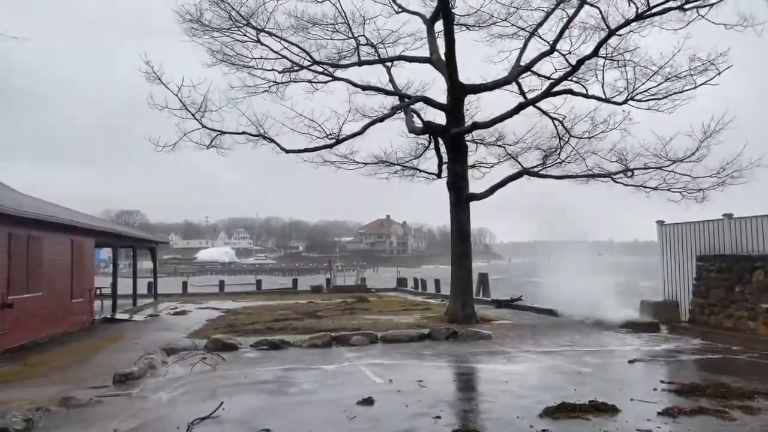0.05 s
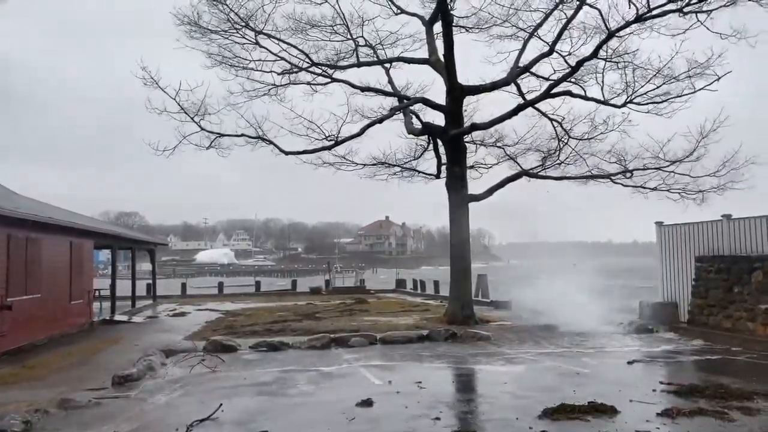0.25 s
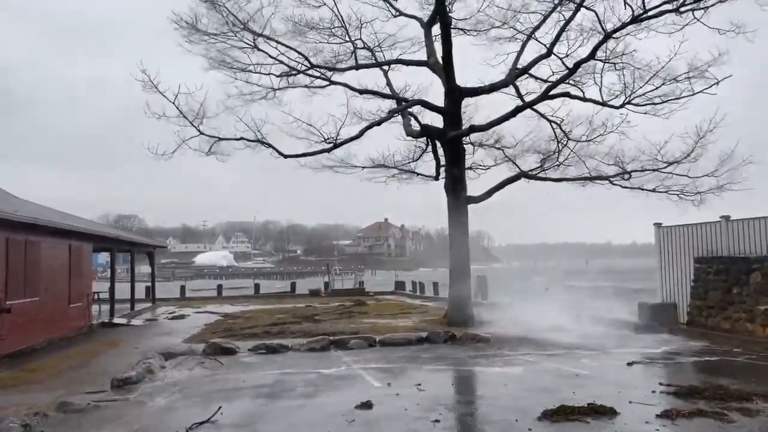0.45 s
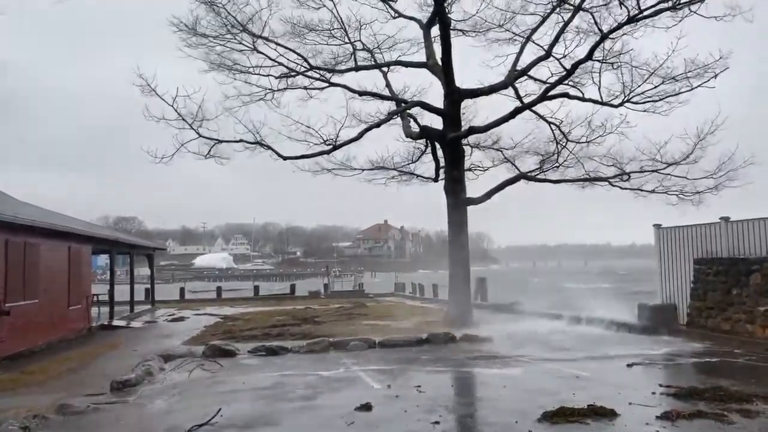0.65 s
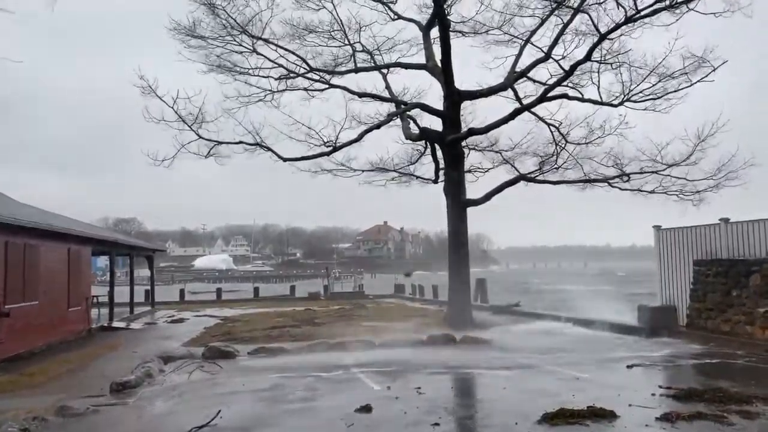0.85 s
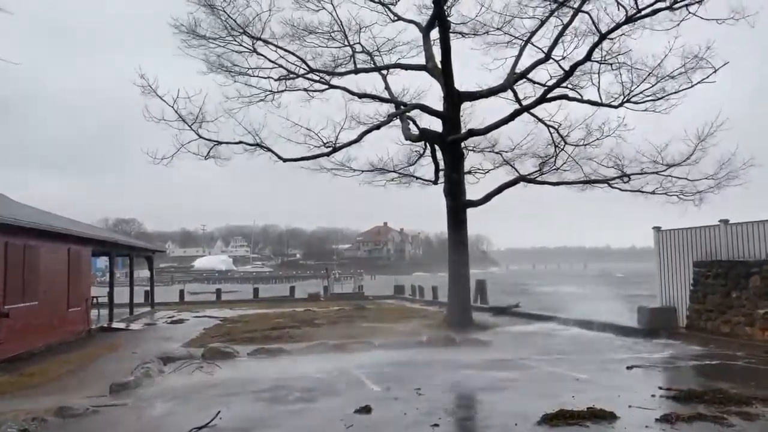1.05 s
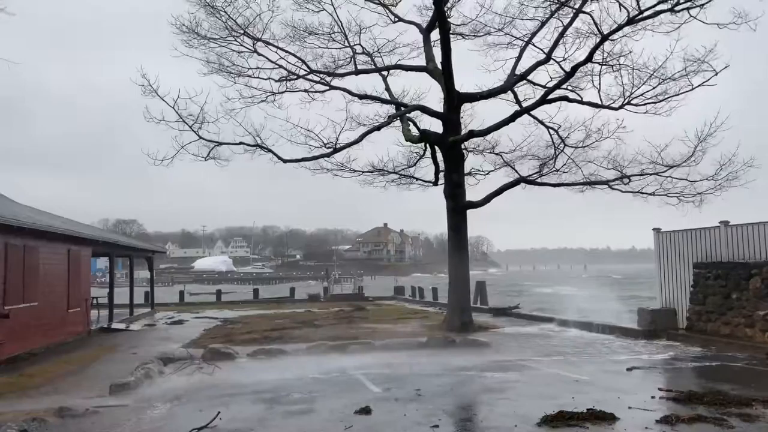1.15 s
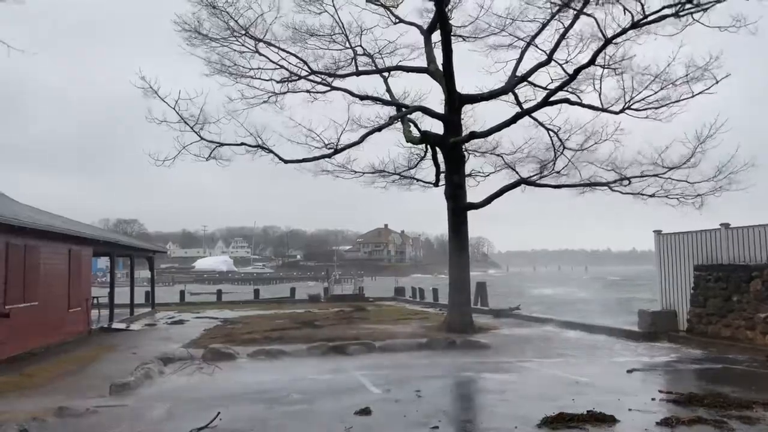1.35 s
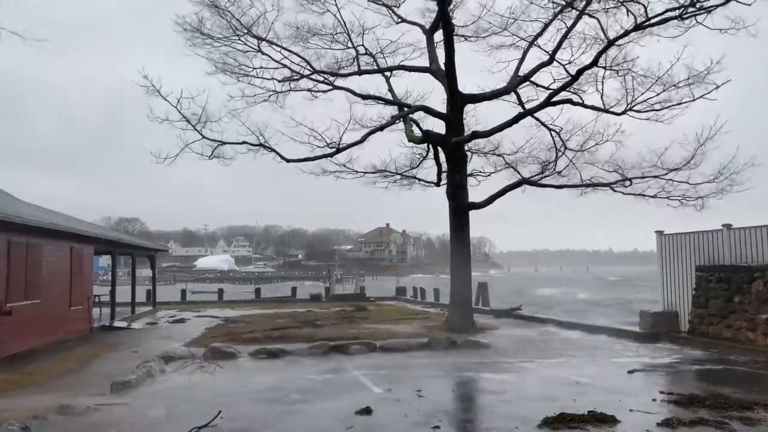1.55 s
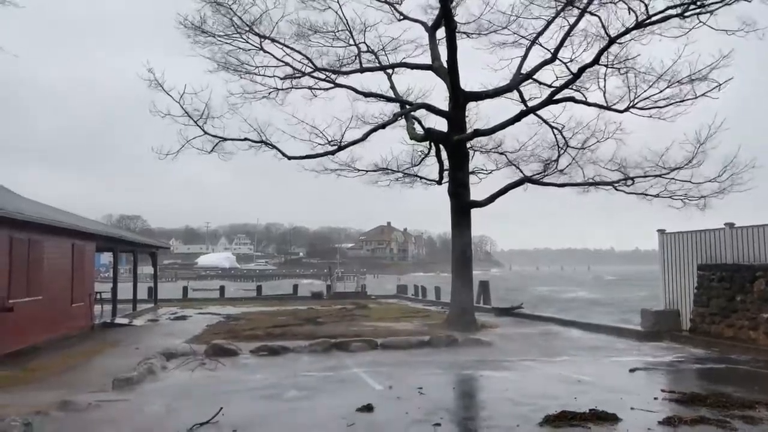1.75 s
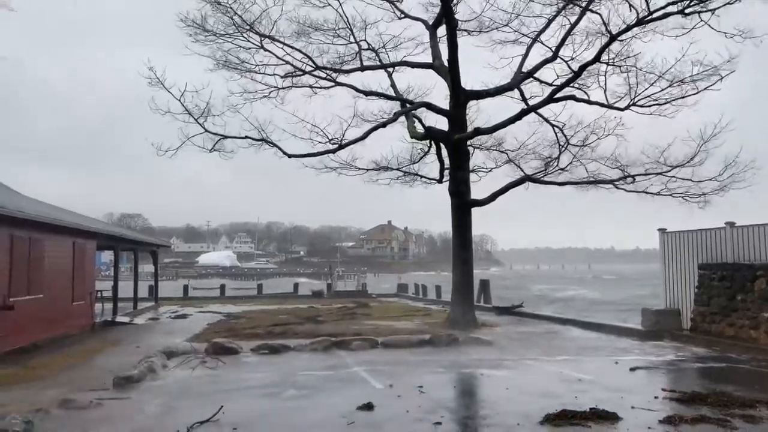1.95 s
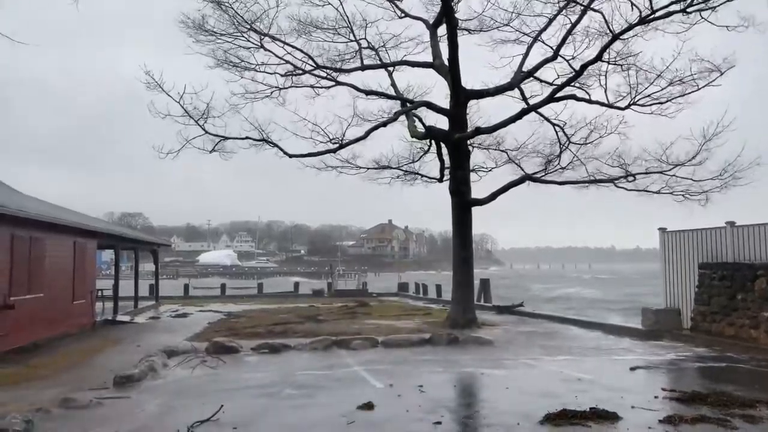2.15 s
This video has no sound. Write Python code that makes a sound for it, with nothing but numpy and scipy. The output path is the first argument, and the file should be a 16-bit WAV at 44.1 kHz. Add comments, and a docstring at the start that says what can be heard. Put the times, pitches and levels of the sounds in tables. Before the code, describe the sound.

Strong wind gusts buffet the microphone over a steady roar of spray and choppy water.

```python
"""Strong gusts of wind buffet a microphone's two openings (left and right) at a flooded harbour edge.
Small swirls of air (eddies) rattle: the faster the air, the higher the rattle reaches.
Big slow eddies thump in the bass, with a few hard pushes and short snaps of air among them.
Behind them, wind, spray and choppy water make a steady roar and hiss."""
import sys
import numpy as np
from scipy import signal
from scipy.fft import rfft, irfft, next_fast_len
from scipy.io import wavfile
from scipy.ndimage import uniform_filter1d, minimum_filter1d, map_coordinates

SR = 44100
rng = np.random.default_rng(int(sys.argv[2]) if len(sys.argv) > 2 else 0)


def digitize_waveform(pressure):
    """Quantize a signal to 16-bit integers and store it at the path in sys.argv[1].

    Rows of a 2-D input are taken as channels; values are limited to [-1, 1].
    """
    field = np.atleast_2d(pressure).T
    bounded = np.clip(field, -1, 1)
    quanta = np.round(bounded * 32767).astype(np.int16)
    wavfile.write(sys.argv[1], SR, quanta)


N = 97020

# Tone of the distant roar: pitch_hz, relative_db
ROAR_TONE = [(25, -33), (45, 3), (150, -5), (600, -4), (1100, -1), (2000, -13.5), (4000, -14),
             (6000, -19.5), (8300, -23.5), (10200, -33.5), (12200, -45)]
# How much of the roar both sides share: pitch_hz, share (0 to 1)
ROAR_SHARED = [(100, 0.59), (500, 0.25), (1500, 0.65), (4000, 0.14), (8500, 0.92), (10500, 0.76)]
# How far the roar's left wave runs ahead of the right: pitch_hz, lead_radians
ROAR_LEFT_LEAD = [(0, 0), (340, -.2), (1290, 4.1), (1890, 4.4), (2330, 6.7), (5340, 7.2), (7150, 5.4),
                  (8010, 3.1), (8870, 2.7), (10200, .2)]
# How much louder the roar is on the left: pitch_hz, left_over_right_db
ROAR_BALANCE = [(600, 3.5), (2000, -2), (3600, 4), (6500, 4.5), (9000, -0.5)]
# Rise and fall of the roar's highest hiss: time_s, boost_db
HISS_SWELL = [(0, -1), (.55, 2), (.8, 5.5), (1.3, 6.5), (1.5, -2), (2.2, 1)]
# Tone of the big eddies: pitch_hz, relative_db
THUMP_TONE = [(8.8, -50), (15, -31), (64, 5.5), (170, -7.5), (220, -31.5), (370, -120)]
# Single hard pushes of air: peak_s, level_db, pitch_hz
HARD_PUSHES = [(.5903, -.3, 100), (.952, -9, 75), (1.151, -8, 160), (1.244, -7, 110), (1.408, -7, 100)]
# Short snaps of air: peak_s, left_level_db, pitch_hz
AIR_SNAPS = [(.287, -17, 1600), (.37, -15, 1000), (.438, -20, 1400), (.771, -17, 950), (.8795, -15, 970),
             (.9357, -9, 800), (1.1487, -8, 1700), (1.467, -15, 2200)]
# The course of the gusts: time_s, thump_db, eddy_db, left_speed_m_per_s, right_speed_m_per_s
GUSTS = [(0, -43, -63.5, 2.7, 7.6), (0.16, -42.5, -62, 3.7, 5), (0.2, -39, -52, 4.6, 4.3),
         (0.241, -18.5, -43, 3.8, 3.3), (0.27, -22.5, -49, 5.6, 4.2), (0.31, -31, -42.5, 2.5, 2.5),
         (0.34, -19, -46.5, 4, 3.2), (0.374, -24, -36, 3, 2.8), (0.412, -33, -50, 4.1, 3.2),
         (0.457, -25.5, -35, 2.9, 1.5), (0.5, -24, -53, 2.5, 4.5), (0.557, -33, -47.5, 5.4, 3.3),
         (0.573, -13, -29.5, 5, 2.4), (0.587, -11, -31, 15, 7), (0.6, -2, -27, 14.4, 5.2),
         (0.621, -23, -33, 9.6, 3.5), (0.653, -19.5, -39, 8.2, 4), (0.66, -24, -37, 5.3, 3.2),
         (0.691, -18.5, -38.5, 3, 2.2), (0.742, -25, -45, 4.8, 2.1), (0.774, -19, -40, 2.8, 4.04),
         (0.812, -32, -50, 1, 0.88), (0.84, -30, -41, 2.8, 2.8), (0.877, -23, -45.5, 5.4, 1.6),
         (0.921, -15, -36.5, 3.1, 5.7), (0.951, -17.5, -28, 5.7, 3.8), (0.98, -13, -40.5, 4.8, 7.2),
         (1.002, -22, -44, 5.3, 6.8), (1.034, -37, -35, 4.4, 3.4), (1.062, -15.5, -43.5, 3.7, 3.6),
         (1.089, -39, -42.5, 2.6, 3), (1.107, -12.5, -33.5, 8.1, 5.5), (1.136, -21, -39.5, 4.6, 2.5),
         (1.151, -10, -35, 4.4, 4.7), (1.18, -12.5, -34.5, 6.1, 4.1), (1.209, -33, -41.5, 4.3, 3.9),
         (1.218, -10, -29.5, 10.7, 5.8), (1.247, -13.5, -42.5, 3.8, 4.4), (1.266, -12.5, -38, 4.76, 2.6),
         (1.3, -22.5, -52.5, 4.6, 4.3), (1.358, -20, -42, 5.9, 6.5), (1.382, -16, -35, 7.7, 7.7),
         (1.396, -17, -37, 20, 16.5), (1.403, -7, -35.5, 3.4, 2.7), (1.424, -16, -38, 6.5, 3.5),
         (1.443, -23, -38, 7.6, 7.6), (1.466, -20, -42, 3.95, 3.5), (1.491, -22, -52, 2.9, 6.4),
         (1.52, -37, -50.5, 3.6, 2.8), (1.562, -19, -46.5, 4.8, 5.1), (1.612, -30.5, -53.5, 2.1, 3.7),
         (1.682, -34, -36.5, 4.3, 3.5), (1.706, -34, -52.5, 4, 2), (1.83, -35, -58.5, 4.1, 5.2),
         (1.893, -42, -43.5, 2.44, 1.93), (1.929, -23, -58, 3.8, 3.6), (1.98, -50, -58.5, 4.2, 4.1),
         (2.061, -34.5, -52.5, 4.4, 4.5), (2.2, -33, -57, 6.1, 5.2)]
# Brief flurries and lulls: peak_s, left_speed_factor, right_speed_factor, width_s
FLURRIES_AND_LULLS = [(.287, 1.3, 1.1, .004), (.564, .6, .6, .007), (.5775, 1.8, 1.8, .004),
                      (.588, .45, .5, .01), (.769, 1.3, 1.5, .004), (.839, 1.6, 1.3, .004),
                      (.899, 1.6, 1.3, .003), (.9415, 2.8, 2.2, .0015), (.955, 1.5, 1.2, .002),
                      (.9865, 1.7, 1.3, .002), (1.0095, 1.6, 1.3, .002), (1.044, 1.5, 1.4, .003),
                      (1.149, 2.2, 1.4, .002), (1.262, 1.5, 1.1, .005), (1.386, 1.4, 1.5, .0025),
                      (1.445, 1.3, 1.2, .003), (1.467, 2.6, 1.8, .002), (1.885, 1.7, 1.6, .008)]
# How much of the rattle both sides share: pitch_hz, share (0 to 1)
EDDY_SHARED = [(100, 0.31), (400, 0.35), (1000, 0.67), (3000, 0.5), (9000, 0.27), (10500, 0.76)]
# How far the rattle's left wave runs ahead of the right: pitch_hz, lead_radians
EDDY_LEFT_LEAD = [(0, 0), (520, .1), (1120, -2), (1890, 0), (3450, 1.4), (5340, .6), (8010, -3.1),
                  (10200, -6.3)]
# Treble lost at the microphone openings: pitch_hz, gain_db
TREBLE_LOSS = [(6500, -1), (7600, -5), (8300, -12), (12000, -9.5)]


def amp(db):
    """Turn decibels into a volume factor."""
    return 10 ** (np.asarray(db) / 20)


def unit(x):
    """Scale a sound to an average power of 1."""
    return x / np.sqrt(np.mean(x ** 2) + 1e-20)


def along(points, hz):
    """Read a (pitch_hz, value) table at any pitch, on a log scale."""
    pitches, values = np.transpose(points)
    return np.interp(np.log(hz + 1), np.log(pitches + 1), values)


def wobble(per_s, t):
    """A smooth curve through per_s random values a second."""
    return map_coordinates(rng.standard_normal(1000), [np.clip(t * per_s, 0, 998)])


def filtered(x, response):
    """Multiply each frequency in x by response(hz)."""
    size = next_fast_len(N + SR // 4)
    return irfft(rfft(x, size) * response(np.fft.rfftfreq(size, 1 / SR)), size)[..., :N]


def stereo_noise(shares, left_lead):
    """Left and right white noise; the part they share is shifted in phase between them."""
    shared, own = rng.standard_normal(N), rng.standard_normal((2, N))
    share = lambda hz: np.clip(along(shares, hz), 0, 1)
    shift = lambda hz: np.exp(1j * np.outer([.5, -.5], along(left_lead, hz)))
    shared = filtered(shared, lambda hz: np.sqrt(share(hz)) * shift(hz))
    return shared + filtered(own, lambda hz: np.sqrt(1 - share(hz)))


def distant_roar(level_db=-38, patch_db=1.5, hiss_above_hz=8500):
    """Wind, spray and choppy water blend into steady noise with faint louder and softer patches."""
    hz, t, spectrum = signal.stft(stereo_noise(ROAR_SHARED, ROAR_LEFT_LEAD), SR, nperseg=512)
    patches = uniform_filter1d(rng.standard_normal(spectrum.shape[1:]), size=6, axis=0)
    patches = unit(uniform_filter1d(patches, size=10, axis=1))
    hiss_band = 1 / (1 + (hiss_above_hz / (hz + 1)) ** 8)
    hiss_db = np.outer(hiss_band, np.interp(t, *np.transpose(HISS_SWELL)))
    noise = signal.istft(spectrum * amp(patch_db * patches + hiss_db), nperseg=512)[1][:, :N]
    tone = lambda f: amp(along(ROAR_TONE, f) + np.outer([.5, -.5], along(ROAR_BALANCE, f)))
    return unit(filtered(noise, tone)) * amp(level_db)


def air_snaps(swings=1.5, right_db=-9):
    """The air pressure swings quickly a few times in each snap, mostly on the left."""
    t = np.arange(N) / SR
    snaps = np.zeros(N)
    for peak_s, db, hz in AIR_SNAPS:
        cycles = (t - peak_s) * hz
        phase = rng.uniform(-1, 1)
        snaps += amp(db) * np.exp(-(cycles / swings) ** 2) * np.cos(2 * np.pi * cycles + phase)
    return snaps * amp([[0], [right_db]])


def hard_pushes():
    """Air shoves both openings at once, with about two slow swings of pressure each time."""
    t = np.arange(N) / SR
    return sum(amp(db) * np.exp(-((t - peak_s) * hz) ** 2) * np.cos(2 * np.pi * hz * (t - peak_s))
               for peak_s, db, hz in HARD_PUSHES)


def big_eddy_thumps(wobble_db=1):
    """Big slow eddies press on both openings nearly alike and thump in the bass."""
    t = np.arange(N) / SR
    time_s, thump_db = np.transpose(GUSTS)[:2]
    noise = stereo_noise(shares=[(60, .88)], left_lead=[(60, .04)])
    bass = unit(filtered(noise, lambda hz: amp(along(THUMP_TONE, hz))))
    loudness = uniform_filter1d(np.abs(signal.hilbert(bass)).mean(0), size=400)
    bass = unit(bass / (loudness + .18) ** .8)  # mostly evened out, so the gusts set the level
    return bass * amp(np.interp(t, time_s, thump_db) + wobble_db * wobble(29.8, t))


def small_eddy_rattle(flutter_depth=.15, flutter_per_s=300, wobble_db=2.2, low_cut_hz=157):
    """Small eddies rattle at each opening; faster air stretches their noise up to higher pitches."""
    frames = dict(fs=SR, nperseg=128, noverlap=112)
    hz, t, spectrum = signal.stft(stereo_noise(EDDY_SHARED, EDDY_LEFT_LEAD), **frames)
    time_s, _, eddy_db, left, right = np.transpose(GUSTS)
    speed = np.array([np.interp(t, time_s, side) for side in (left, right)])
    flurry = np.ones_like(speed)
    for peak_s, left_factor, right_factor, width_s in FLURRIES_AND_LULLS:
        bump = np.exp(-2 * ((t - peak_s) / width_s) ** 2)
        flurry *= 1 + np.outer([left_factor - 1, right_factor - 1], bump)
    shared_flutter = wobble(flutter_per_s, t)
    flutter = np.array([shared_flutter + wobble(flutter_per_s, t) for _ in range(2)]) / np.sqrt(2)
    speed *= flurry * np.exp(flutter_depth * flutter / flurry.clip(1) ** 2)  # flurries flutter less
    level_db = np.interp(t, time_s, eddy_db) + wobble_db * np.array([wobble(90, t) for _ in range(2)])
    level_db += 5.5 * np.log2(flurry)  # a flurry is louder as well as faster
    reach_hz = 109.4 * speed[:, None]
    fall_db = 10 * (hz[:, None] / reach_hz) ** .8
    rattle = signal.istft(spectrum * amp(level_db[:, None] - fall_db), **frames)[1][:, :N]
    tone = lambda f: amp(along(TREBLE_LOSS, f)) / np.sqrt(1 + (low_cut_hz / (f + 1)) ** 6)
    return np.sqrt(SR / 2) * filtered(rattle, tone)


def scene():
    """Add up all the sounds; each hard push briefly takes the place of the thumps."""
    pushes = hard_pushes()
    thump_gain = np.clip(1 - 2 * np.abs(signal.hilbert(pushes)), 0, 1)
    return small_eddy_rattle() + thump_gain * big_eddy_thumps() + pushes + distant_roar() + air_snaps()


def record(dry, ceiling=.98, hold_s=.003, top_hz=12220):
    """A fast limiter turns down the loudest peaks, then the highest treble is cut off."""
    hold = int(hold_s * SR)
    needed_gain = np.minimum(1, ceiling / (np.abs(dry).max(0) + 1e-9))
    gain = uniform_filter1d(minimum_filter1d(needed_gain, size=2 * hold), size=hold)
    return filtered(dry * gain, lambda hz: hz < top_hz)


dry = scene()
out = record(dry)
digitize_waveform(out)
```